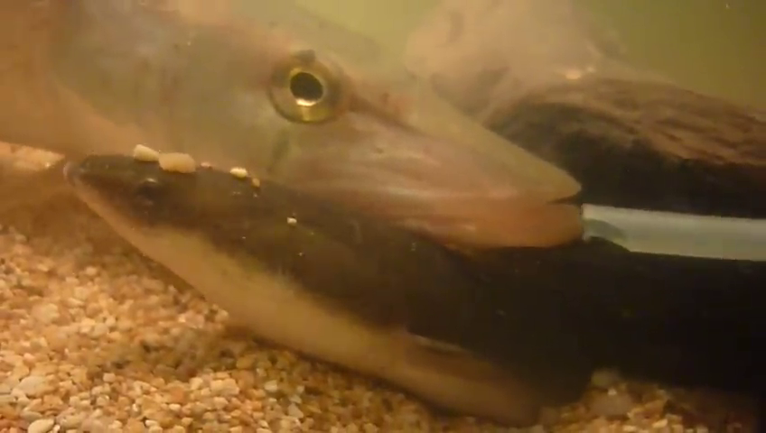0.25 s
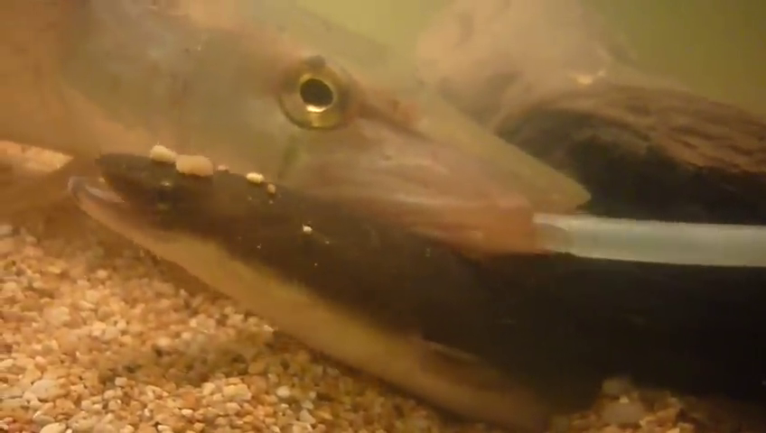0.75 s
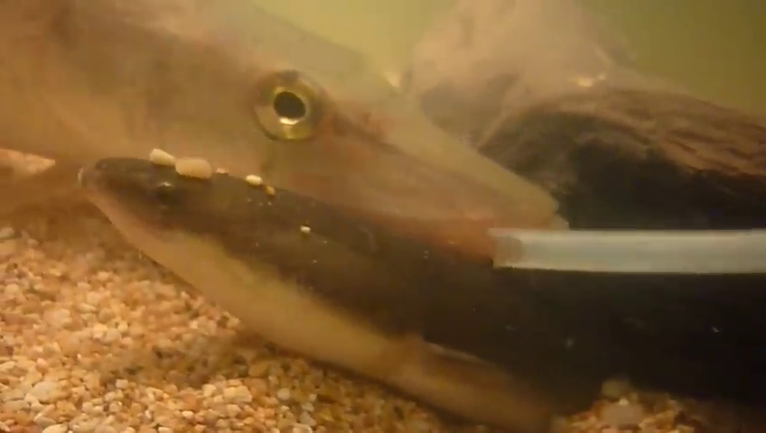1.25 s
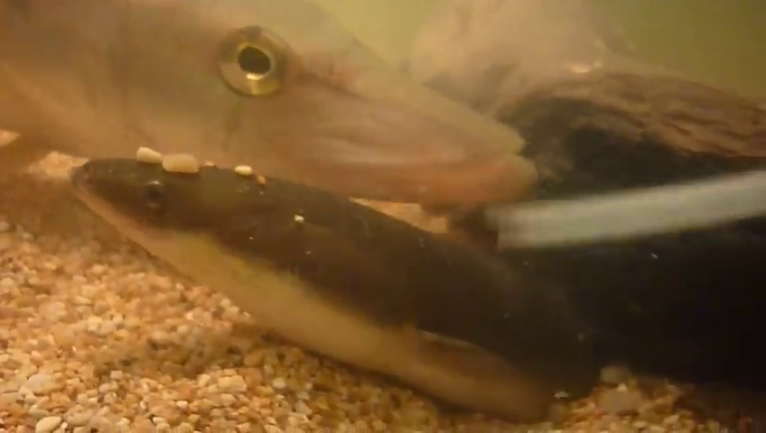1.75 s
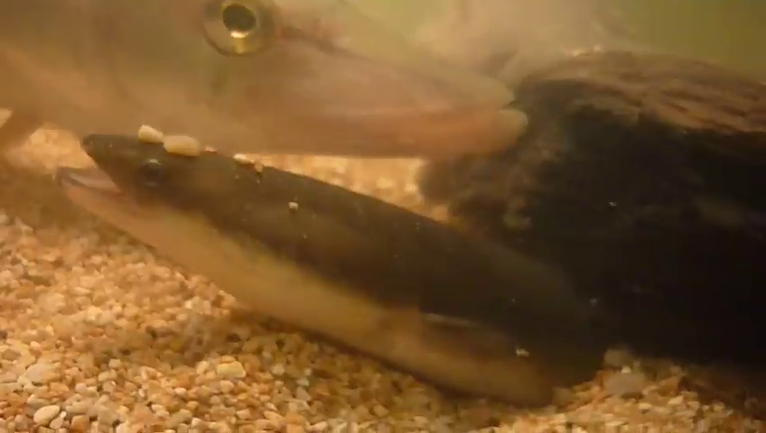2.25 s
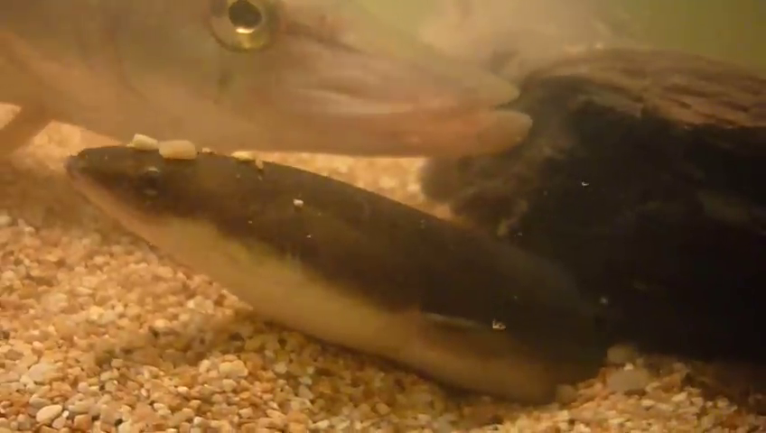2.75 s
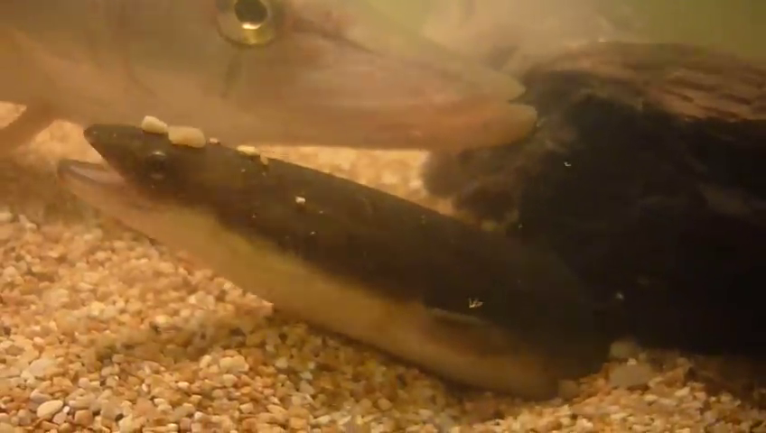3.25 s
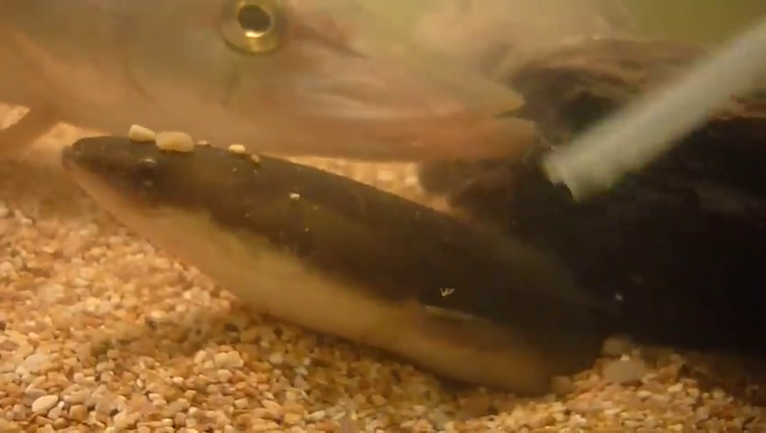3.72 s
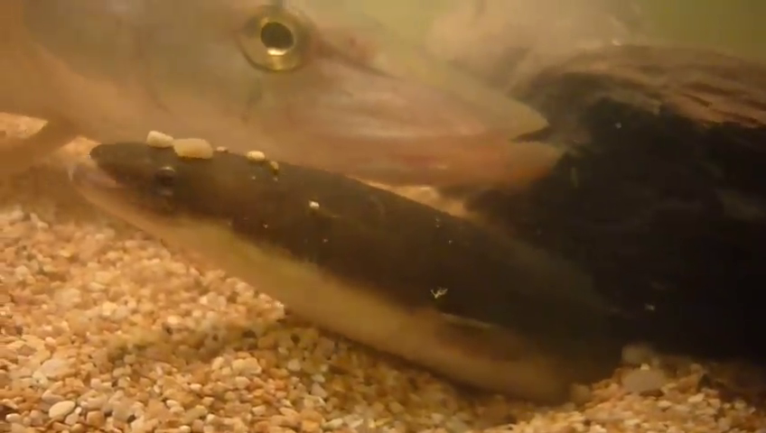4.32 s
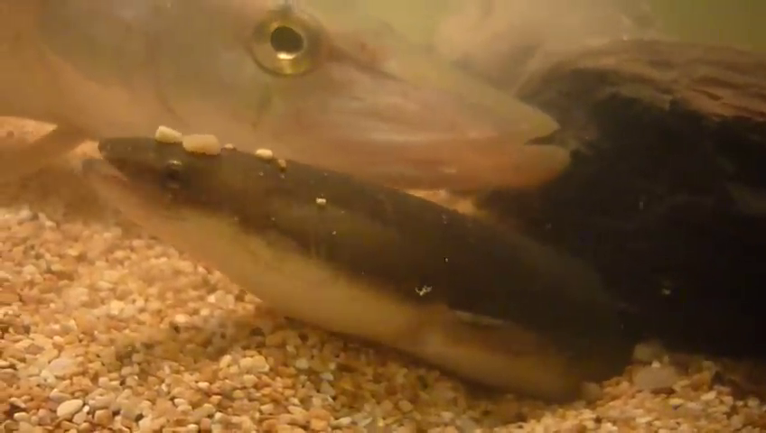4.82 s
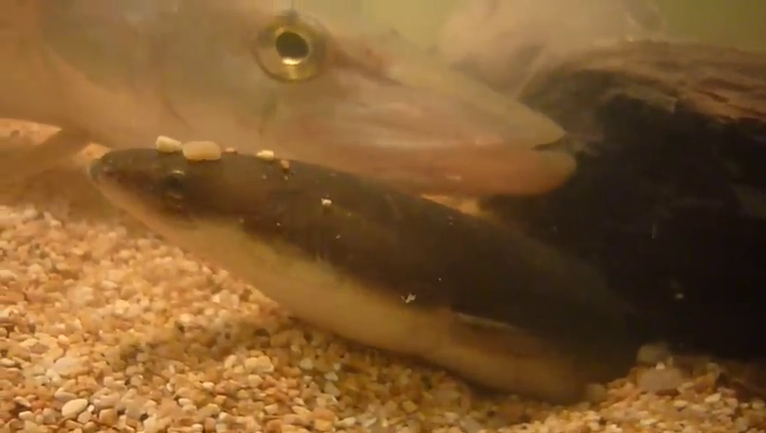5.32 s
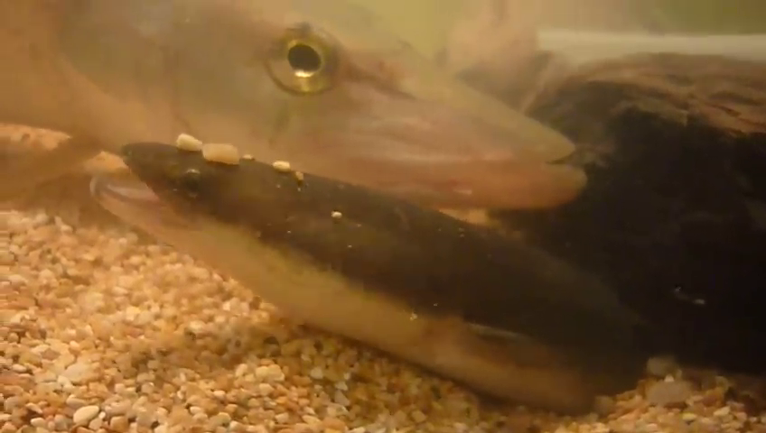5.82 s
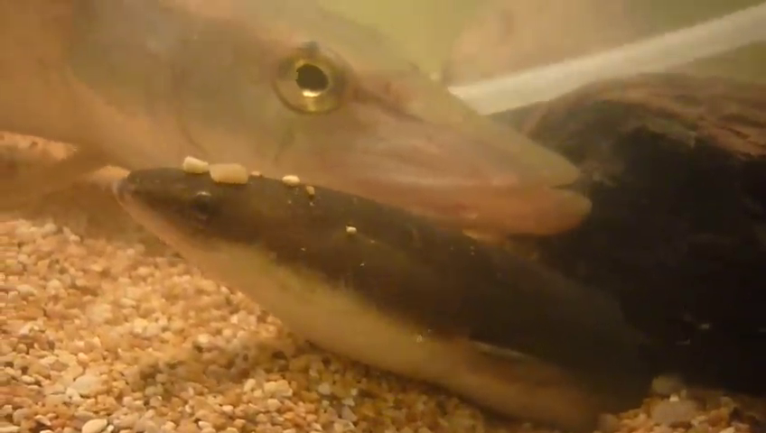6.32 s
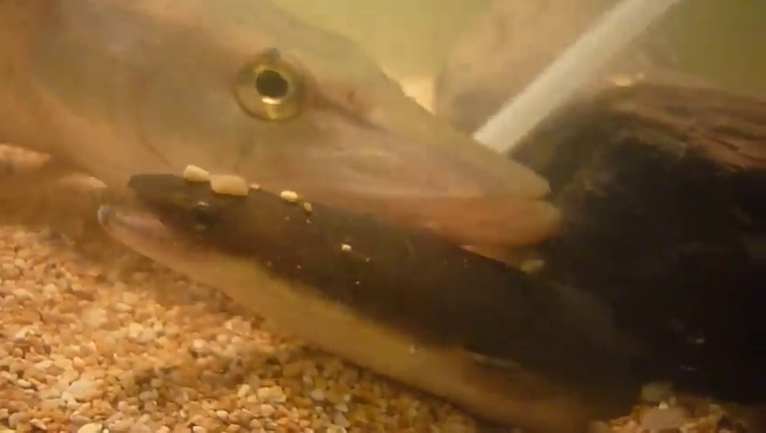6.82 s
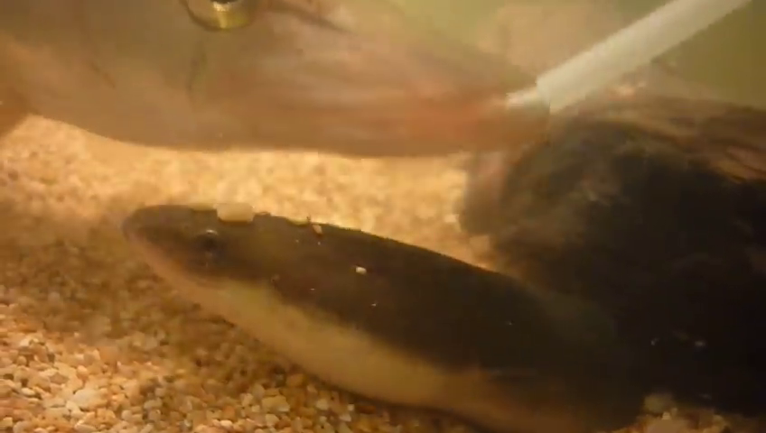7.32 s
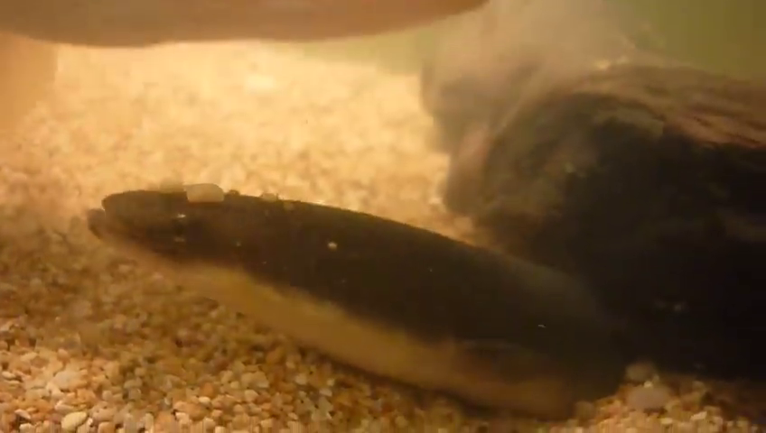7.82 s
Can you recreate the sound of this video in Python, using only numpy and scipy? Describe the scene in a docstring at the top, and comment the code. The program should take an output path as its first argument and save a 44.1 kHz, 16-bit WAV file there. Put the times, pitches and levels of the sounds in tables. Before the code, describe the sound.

An aquarium filter trickles without pause: irregular sharp ticks, watery plops and little drips, each very short and glassy. The loudest snaps come a little after five and at six seconds, with more frequent bright drips towards the end. Underneath, a mains pump hums steadily and low, with muffled cabinet rumble. Close small-camera pickup in a small room, mono, slightly hissy, with a barely audible thin whistle. The fish themselves make no sound.

```python
"""Fish tank with a trickling filter

Beside a lidded fish tank, with a small camera outside the glass as the microphone. Bubbles plop, drops slap
and a fine trickle runs: damped sines that ring the lid's air space, the panes and then the room.
Behind them a mains pump hums and rumbles through its cabinet: steady sines and resonant noise.
The camera adds shaped hiss, two thin whistles, a treble roll-off and a constant offset."""
import sys
import numpy as np
from scipy import signal
from scipy.fft import rfft, irfft, next_fast_len
from scipy.io import wavfile
from scipy.ndimage import map_coordinates

SR = 44100
rng = np.random.default_rng(int(sys.argv[2]) if len(sys.argv) > 2 else 0)


def pcm_store(signal):
    """Save signal as 16-bit PCM."""
    levels = np.round(np.clip(np.atleast_2d(signal), -1, 1) * 32767)
    wavfile.write(sys.argv[1], SR, levels.astype(np.int16).T)


N = 355446  # samples, about 8 s

# clearest single bubbles, levels ahead of the lid and panes:
# start_s, level_db, start_pitch_hz, life_cycles, climb_percent_per_cycle
PLOP_EVENTS = [(0.139, -25, 6460, 4.5, 1.7), (0.142, -21.5, 3400, 8.8, 1.2), (.291, -19.5, 920, 6.9, 0.66),
               (0.296, -31, 1230, 8, 0.26), (0.297, -19, 5900, 8.3, 1.2), (.35, -40, 965, 5.9, 0.33),
               (.398, -25.5, 5670, 5.7, 1.5), (.422, -31.5, 1477, 4.1, 3.4), (.496, -43, 590, 4.9, 1.7),
               (0.516, -41.5, 570, 40, 2.7), (0.555, -23, 5130, 3, 1.5), (.621, -26.5, 4310, 4.6, 1.5),
               (.689, -27, 1200, 4.7, 1.2), (.743, -37, 1225, 6, 1.4), (.789, -22, 1434, 4.3, 2.7),
               (.87, -30.5, 2130, 5.7, .5), (.873, -36, 1220, 6.4, 1), (.965, -31, 1126, 19, 2.5),
               (1.038, -36.5, 1230, 6, 0.64), (1.143, -21, 6300, 3.9, 1.9), (1.2, -24, 1650, 3.4, 4),
               (1.219, -30, 1030, 13.5, 2.2), (1.261, -31, 1860, 6, 1.7), (1.32, -32.5, 1910, 7.1, 1.6),
               (1.417, -23, 5830, 5.2, 1.3), (1.511, -33, 2090, 4.9, 1.8), (1.522, -25, 6910, 6.6, 1.5),
               (1.633, -24.5, 5800, 3.9, 1.5), (1.649, -33, 1510, 8.6, 1.7), (1.669, -31.5, 940, 5.1, 5.4),
               (1.787, -23, 5940, 3.1, 1.6), (1.786, -30.5, 1200, 2.7, 2.1), (1.975, -22.5, 6400, 3.8, 1.9),
               (1.982, -34.5, 2180, 4.5, 3), (2.041, -30, 1420, 4.9, .8), (2.071, -22.5, 641, 6.3, 2.1),
               (2.099, -33, 690, 5, 1.3), (2.126, -41, 743, 6.2, 2.5), (2.129, -31.5, 1860, 6.4, 2),
               (2.21, -28, 2290, 4.1, 1.1), (2.282, -32, 2200, 5.2, 2.5), (2.428, -24, 3030, 4.7, 1.3),
               (2.449, -23.5, 6800, 3.7, 2), (2.529, -25, 1850, 6.1, 1.6), (2.628, -25.5, 4440, 4, 1.5),
               (2.644, -16, 1436, 1.9, 2.9), (2.781, -30, 1245, 2.7, 3.5), (2.784, -26.5, 1780, 1.8, 3.4),
               (2.881, -19, 747, 20, 1.67), (2.905, -32, 780, 20, .1), (2.932, -21.5, 7560, 7, 1),
               (2.99, -27, 3520, 3.5, 2.3), (3.006, -23.5, 6460, 5.1, 1.6), (3.028, -34, 2380, 4, 1.4),
               (3.072, -30, 963, 5.3, 2.3), (3.098, -40, 2690, 8.5, .2), (3.121, -31.5, 1630, 10, 1.7),
               (3.2, -29, 4160, 5.4, 1.3), (3.323, -29, 4000, 5.8, 1.1), (3.372, -21.5, 4700, 1.1, 3),
               (3.445, -27, 1170, 3, 1.5), (3.467, -32.5, 1920, 5.4, 1.8), (3.603, -22.5, 6100, 5.2, 1.5),
               (3.657, -19, 5000, 2.4, 1.8), (3.807, -33.5, 1400, 4.5, 2.5), (3.886, -27, 1220, 5.2, 2.1),
               (3.947, -21.5, 5060, 2.3, 1.8), (4.134, -37.5, 930, 5, 1.3), (4.135, -32, 3350, 5.1, 0.43),
               (4.347, -27.5, 3410, 1.8, 2), (4.356, -35, 1230, 5.2, 2.2), (4.378, -22, 4500, 2.7, 1.6),
               (4.385, -32, 2930, 5.2, 1.4), (4.392, -37, 1230, 6, .8), (4.423, -33.5, 1250, 5.2, .8),
               (4.536, -36, 1420, 7.2, 1), (4.523, -24, 4700, 7.5, 1.4), (4.569, -33.5, 1015, 4.8, 1.4),
               (4.629, -35, 1076, 5.7, 1.3), (4.634, -22.5, 3600, 2.5, 2), (4.657, -37, 1880, 7, 0.91),
               (4.675, -32, 910, 9.6, 2.4), (4.721, -32.5, 1900, 5.1, 0.99), (4.785, -21, 4900, 1.9, 2.5),
               (4.796, -28, 1340, 6.6, 0.91), (4.893, -26, 5700, 3.9, 1.8), (4.99, -23.5, 4800, 2.4, 2),
               (5.04, -29, 1440, 7, 3), (5.087, -35, 1210, 6.6, 1.4), (5.173, -8.5, 5320, 6.7, 1.4),
               (5.188, -36, 1910, 6, 0.89), (5.228, -25, 1380, 2.7, 1.8), (5.305, -24, 6950, 5.6, 1.4),
               (5.459, -25, 3180, 2.9, 1.1), (5.54, -28, 4440, 5.1, 1.2), (5.562, -34, 1597, 20, 0.14),
               (5.632, -28, 6250, 3, 1.8), (5.637, -26.5, 2110, 6.8, 0.44), (5.689, -28.5, 3970, 4.8, 1.2),
               (5.743, -27, 5530, 3.5, 1.6), (5.802, -25, 7600, 8.3, 1.2), (5.837, -40, 1300, 7, 0.47),
               (5.911, -39, 909, 20, 1.8), (5.922, -36.5, 1200, 16, 1.34), (6.004, -19, 3730, 2.8, 2.3),
               (6.005, -38, 910, 6.6, 2.7), (6.012, -31.5, 1890, 7, 0.33), (6.014, -34.5, 1400, 7, 0.26),
               (6.044, -12.5, 7340, 4.7, 2.4), (6.149, -37, 1250, 5.3, 1.5), (6.156, -24, 7360, 11, 1.1),
               (6.258, -43, 1240, 7, 0.5), (6.277, -32, 3300, 6.5, .9), (6.36, -23, 5590, 6, .9),
               (6.36, -28.5, 1360, 3.8, 0.98), (6.478, -31, 1180, 7.2, 0.81), (6.483, -38, 2450, 5, 1.1),
               (6.498, -20, 4800, 5.3, 1.8), (6.537, -18.5, 5150, 4.4, 1.1), (6.668, -22, 6800, 3.2, 1.5),
               (6.752, -25, 2760, 1.3, 2), (6.76, -19.5, 5550, 3.8, 1.8), (6.814, -31, 1480, 5.1, 2.1),
               (6.856, -18.5, 5020, 2.9, 2), (6.867, -31.5, 2580, 4.7, 1.4), (6.902, -37, 2730, 5, 1.2),
               (6.929, -37.5, 1400, 5.3, 1), (6.95, -21.5, 4400, 2, 1.3), (7.066, -21, 2760, 2.3, 3.2),
               (7.079, -23.5, 5800, 5, 1.3), (7.149, -23.5, 5100, 6.6, 1.1), (7.23, -29.5, 2450, 2.9, 1.8),
               (7.31, -32.5, 1233, 3.6, 1.3), (7.334, -26, 3800, 5.5, 2.2), (7.393, -19.5, 6500, 3.3, 1.6),
               (7.492, -34.5, 2580, 4, 1), (7.556, -19, 4980, 5.6, 1.8), (7.585, -27.5, 1150, 7.8, 1),
               (7.683, -31, 4100, 3.4, 1.8), (7.822, -22.5, 4230, 2.8, 1.8), (7.908, -35, 2130, 4.7, 1.3),
               (7.984, -31.5, 990, 3.9, 2.2), (7.992, -22, 5960, 3.5, 1.4)]
# water closing over a bubble: level over a 1 kHz plop (dB), tilt (dB per octave), life (cycles)
THUD_DB, THUD_DB_PER_OCTAVE, THUD_CYCLES = -1, 1, 1.45
# drops slapping the surface, levels ahead of the lid and panes: start_s, level_db, centre_hz
SLAP_EVENTS = [(.689, -24, 1090), (.789, -24, 1000), (2.042, -33, 1590), (2.1294, -19, 2800),
               (2.2074, -17, 1300), (2.282, -24, 1600), (2.4294, -30, 2800), (2.6424, -12, 2800),
               (2.7826, -26, 2000), (3.467, -30, 2010), (3.807, -27, 1700), (3.873, -26, 2210),
               (4.5221, -12, 2740), (4.798, -27, 1200), (5.0419, -19, 1610), (5.464, -24, 1490),
               (5.637, -25, 1400), (5.771, -25.5, 1290), (5.9658, -15, 2820), (6.0053, -6.5, 2780),
               (6.355, -13.5, 2820), (6.362, -18.5, 920), (6.479, -22, 990), (6.814, -25, 1900),
               (7.0466, -27, 2000), (7.1487, -13, 2800), (7.309, -25, 1000), (7.584, -25, 900),
               (7.9079, -19, 2800), (7.984, -31, 1200)]
# small bubbles, relative level by pitch: pitch_hz, level_db
TRICKLE_COLOUR = [(500, -30.5), (800, -16), (1300, -9.5), (2300, -7.5), (3500, 4), (5500, 12), (7000, 16),
                  (9000, 19.5)]
# small bubbles, level over time ahead of the lid and panes: time_s, low_level_db, high_level_db
TRICKLE_FLOW = [(0.0, -54.5, -44), (0.45, -56, -56), (0.81, -55, -48), (1.03, -56, -54), (1.57, -52.5, -52),
                (2.18, -56, -51.5), (2.49, -58, -47.5), (2.96, -50.5, -55.5), (3.28, -65, -52),
                (3.7, -54.5, -49.5), (4.2, -55, -55.5), (4.53, -53, -49), (5.07, -54, -51.5),
                (5.4, -59, -51), (6.1, -54.5, -47.5), (6.55, -58.5, -48.5), (7.16, -57.5, -50),
                (8.06, -54.5, -48.5)]
# air space under the lid: pitch_hz
LID_PITCHES = [682, 717, 802, 833, 950, 1029, 1176, 1236, 1275, 1419, 1510, 1665, 1845, 1941, 2193, 2443,
               2502, 2660, 2710, 3007, 3385, 3500, 3542, 3633, 3754, 4150, 4646, 5356]
# air space under the lid, one row for each of its pitches: width_hz, gain_db
LID_RESONANCES = [(21.6, -2), (24, 9), (18.8, -13.5), (37, 4.5), (22.5, 6.5), (19.9, 4), (19.4, -8.5),
                  (25, 12), (29.8, 5), (31.4, 10.5), (38, -1.5), (21.7, 5.5), (25, -2.2), (21.9, 10),
                  (21.3, 5), (19.6, 10), (30, 7), (25, 11), (21.6, 11), (21.6, 5), (41.4, 7), (27.8, 12),
                  (35, 9.5), (35, 10), (35, 1.5), (50, 7), (60.3, 3.5), (78.5, -4.5)]
# dense ring of panes and lid: frequency_hz, t60_s
GLASS_DECAY = [(500, 0.11), (2000, 0.12), (4000, 0.11), (8000, 0.066)]
# room around the tank: frequency_hz, t60_s
ROOM_DECAY = [(500, 0.33), (1500, 0.2), (4000, 0.23), (8000, 0.31)]
# pump hum at mains orders: frequency_hz, rms_level_db
PUMP_HUM = [(50, -73), (100, -49), (150, -59), (200, -53.5), (300, -57)]
# cabinet resonances under the pump rumble: frequency_hz, width_hz, relative_level_db
CABINET_RESONANCES = [(132.3, 17.6, 1), (222.5, 18.3, 0.5), (258.8, 13.6, -1.5), (286, 28.4, -0.5),
                      (334.4, 49, -3.5), (387, 42, -5.5), (447, 60, -11)]
# colour of the camera hiss: frequency_hz, relative_level_db (per Hz)
HISS_COLOUR = [(30, -18.5), (80, -9), (200, -13.5), (500, 0.5), (900, -6), (2500, -14.5), (5000, -9),
               (7000, -10.5), (9000, -20.5)]
# treble filter of the camera: frequency_hz, gain_db
CAMERA_ROLL_OFF = [(20, 1.5), (6500, 1), (7500, -3.5), (8200, -12), (8600, -21), (9000, -38)]
# thin whistles of the camera: frequency_hz, rms_level_db
CAMERA_WHISTLES = [(7707, -72.5), (8290, -78)]
OFFSET = -.0511  # constant shift, as a fraction of full scale
TOP_HZ = 9150  # nothing is picked up above this


def plops():
    """One ringing bubble each, opened by the short thud of water closing over it, strongest on tiny ones."""
    start_s, level_db, hz, cycles, climb_percent = np.transpose(PLOP_EVENTS)
    rise_per_life = cycles * np.log1p(climb_percent / 100)
    ring = bubbles(start_s, hz, cycles, rise_per_life, level_db, length=3000)
    thud_db = level_db + THUD_DB + THUD_DB_PER_OCTAVE * np.log2(hz / 1000)
    thud = bubbles(start_s, 0.998 * hz, THUD_CYCLES, 0.25, thud_db, length=400)
    return ring + thud


def slaps():
    """Each drop pushes the surface for about one cycle, so its colour is broad."""
    start_s, level_db, hz = np.transpose(SLAP_EVENTS)
    return bubbles(start_s, hz, 0.86, 0.22, level_db, length=300)


def trickle(count=4000):
    """A stream of small bubbles of all sizes, mostly faint, coming in clumps."""
    clump, when, pitch, size, life = rng.random((count, 5)).T
    clump_starts = rng.random(count // 5) * N / SR
    own_clump = (clump * len(clump_starts)).astype(int)
    start_s = np.clip(clump_starts[own_clump] + .015 * when, 0, N / SR)  # a clump spans 15 ms
    hz = 650 * (9000 / 650) ** pitch ** .8
    level_db = -1.8 * np.log(size + 0.008) + along(TRICKLE_COLOUR, hz)
    small = bubbles(start_s, hz, 2.8 + 5 * life, 0.095, level_db, length=600)
    low = filtered(small, lambda f: 1 / (1 + (f / 2300) ** 4))
    high = small - low
    times, low_db, high_db = np.transpose(TRICKLE_FLOW)
    t = np.arange(N) / SR
    low_gain = amp(np.interp(t, times, low_db))
    high_gain = amp(np.interp(t, times, high_db))
    return low_gain * unit(low) + high_gain * unit(high)


def lid(water):
    """The air between water and lid rings at its own pitches; some sound escapes directly, duller."""
    modes = np.c_[LID_PITCHES, LID_RESONANCES]
    return filtered(water, lambda f: 1 / (1 + 1j * f / 2500) + resonances(modes, f))


def panes(water):
    """Panes and lid ring densely and briefly, passing on the treble best."""
    bright = filtered(water, lambda f: 1j * f / (2500 + 1j * f))
    return amp(1.0) * dense_ring(bright, GLASS_DECAY, delay_s=.0003)


def room(tank):
    """The room answers the tank 6 ms later with a dense tail."""
    return amp(-4.0) * dense_ring(tank, ROOM_DECAY, delay_s=.006)


def pump():
    """Mains orders hum over a wavering rumble that rings the cabinet."""
    rumble = filtered(rng.standard_normal(N), lambda f: resonances(CABINET_RESONANCES, f))
    rumble_gain = amp(-48.5 + 1.4 * wobble(7))
    return tones(PUMP_HUM, waver_db=.25) + rumble_gain * unit(rumble)


def camera_hiss():
    """Steady noise of the camera, coloured, at -50 dB rms ahead of its treble filter."""
    noise = rng.standard_normal(N)
    return amp(-50.0) * unit(filtered(noise, lambda f: amp(along(HISS_COLOUR, f))))


def bubbles(start_s, hz, cycles, rise, level_db, length):
    """Damped sines, soft start, pitch rising as the bubble nears the surface; life = decay by 1/e."""
    t = np.arange(length)[None] / SR
    columns = (start_s, hz, cycles, rise, level_db)
    start_s, hz, cycles, rise, level_db = (np.reshape(v, (-1, 1)) for v in columns)
    age = t * hz / np.maximum(cycles, .5)  # in lives
    climb = np.maximum(rise, .001) * np.minimum(age, 3)  # ever faster, for up to three lives
    phase = 2 * np.pi * hz * t * np.expm1(climb) / np.maximum(climb, 1e-9)
    soft_start = 1 - np.exp(-t * hz)
    fade = np.hanning(2 * length)[length:]
    wave = amp(level_db) * np.sin(phase) * np.exp(-age) * soft_start * fade
    at = np.round(start_s * SR).astype(int) + np.arange(length)
    return np.bincount(at.ravel(), wave.ravel(), N + SR)[:N]


def dense_ring(x, t60s, delay_s):
    """Noise tails, each frequency dying at its own speed; a fresh random tail every eighth of a second."""
    piece = SR // 8
    pieces = np.pad(x, (0, -N % piece)).reshape(-1, piece)
    noise = rng.standard_normal((len(pieces), 3 * piece))
    hz, t, spectrum = signal.stft(noise, SR, nperseg=128)
    decay = amp(-60 * t / along(t60s, hz)[:, None])
    tails = signal.istft(spectrum * decay, SR, nperseg=128)[1]
    tails = tails / np.sqrt(np.mean(np.sum(tails ** 2, axis=1)))  # mean energy 1
    wet = signal.fftconvolve(pieces, tails, axes=1)
    starts = round(delay_s * SR) + piece * np.arange(len(pieces))[:, None]
    at = starts + np.arange(wet.shape[1])
    return np.bincount(at.ravel(), wet.ravel())[:N]


def resonances(modes, f):
    """Causal sum of resonances (Hz, width Hz, dB), neighbours of opposite sign."""
    total = 0
    for k, (centre, width, db) in enumerate(modes):
        damping = 1j * f * width
        total = total + (-1) ** k * amp(db) * damping / (centre * centre - f * f + damping)
    return total


def tones(lines, waver_db):
    """Steady sines that waver a little in level."""
    t = np.arange(N) / SR
    total = np.zeros(N)
    for hz, rms_db in lines:
        level = np.sqrt(2) * amp(rms_db + waver_db * wobble(1.4))
        total += level * np.sin(2 * np.pi * (hz * t + rng.random()))
    return total


def wobble(rate):
    """A smooth random curve, rate knots a second."""
    knots = rng.standard_normal(int(N * rate / SR) + 4)
    return map_coordinates(knots, [np.arange(N) * rate / SR])


def filtered(x, response):
    """x times a complex response of frequency."""
    m = next_fast_len(N + SR // 2)  # room for the ringing
    return irfft(rfft(x, m) * response(np.fft.rfftfreq(m, 1 / SR)), m)[:N]


def along(points, hz):
    """Value at hz between (Hz, value) points on a log axis."""
    f, v = np.transpose(points)
    return np.interp(np.log(hz + 1), np.log(f + 1), v)


def amp(db):
    """Gain of a dB value."""
    return 10 ** (np.asarray(db) / 20)


def unit(x):
    """x at rms 1."""
    return x / np.sqrt(np.mean(x ** 2) + 1e-20)


def scene():
    """Water under the lid and between the panes, in the room, over the pump."""
    water = plops() + slaps() + trickle()
    tank = lid(water) + panes(water)
    return (tank + room(tank) + pump())[None]


def record(dry):
    """The camera adds hiss, rolls off the treble, whistles and sits off centre."""
    heard = dry[0] + camera_hiss()
    heard = filtered(heard, lambda f: amp(along(CAMERA_ROLL_OFF, f)))
    heard = heard + tones(CAMERA_WHISTLES, waver_db=1.1)
    return filtered(heard, lambda f: f < TOP_HZ)[None] + OFFSET


dry = scene()
out = record(dry)
pcm_store(out)
```